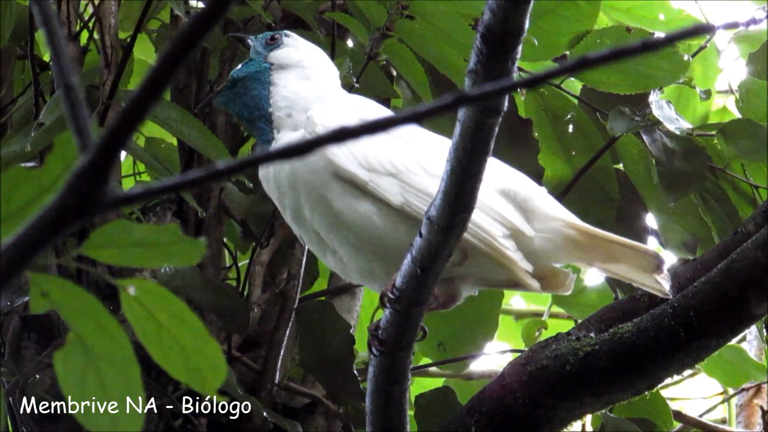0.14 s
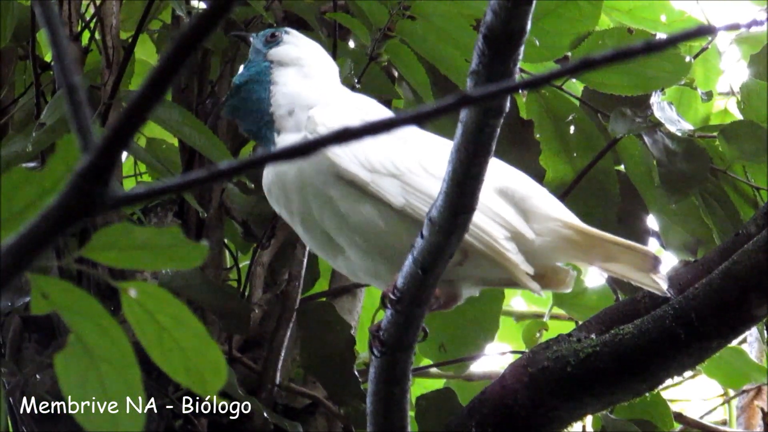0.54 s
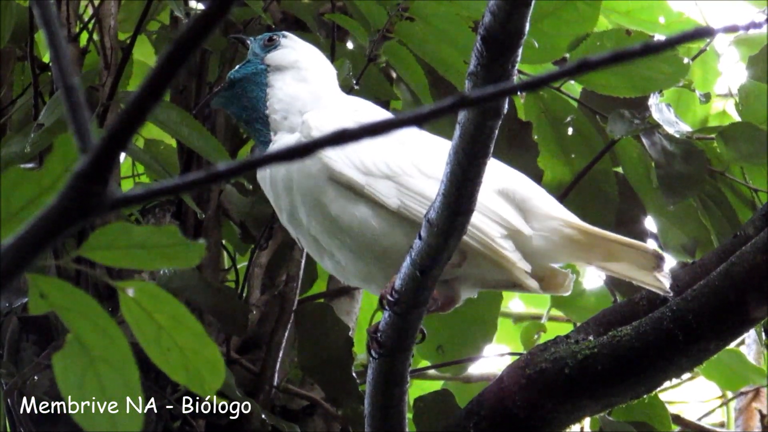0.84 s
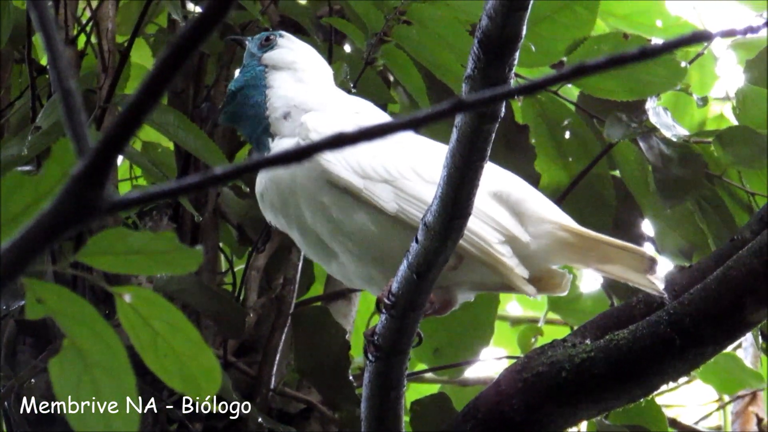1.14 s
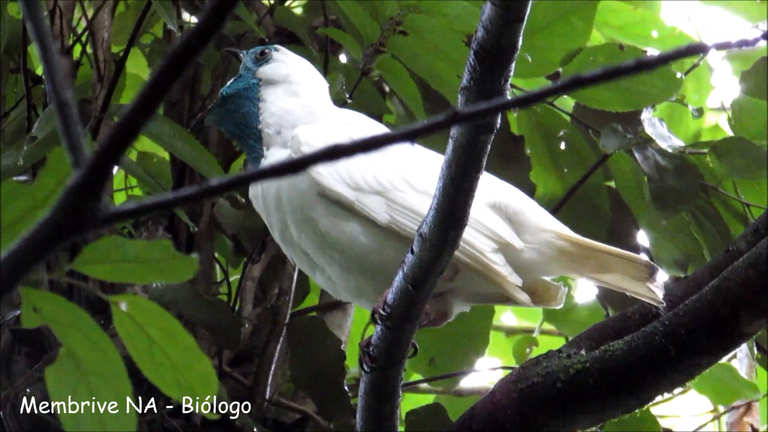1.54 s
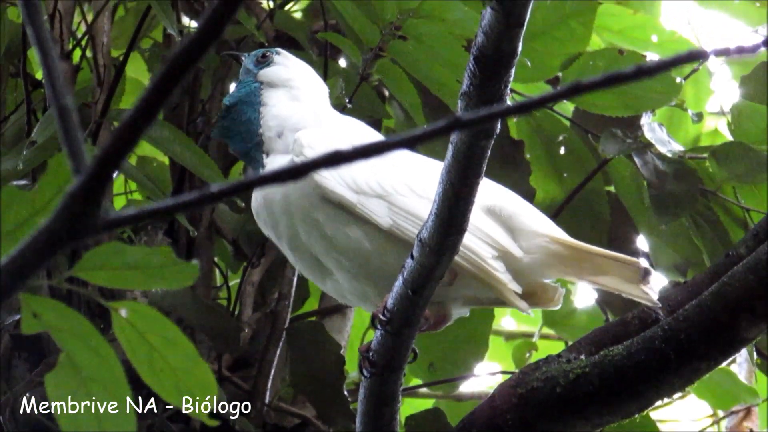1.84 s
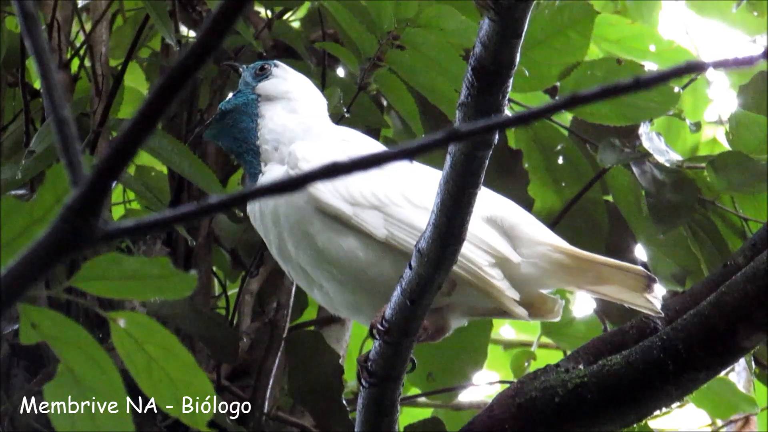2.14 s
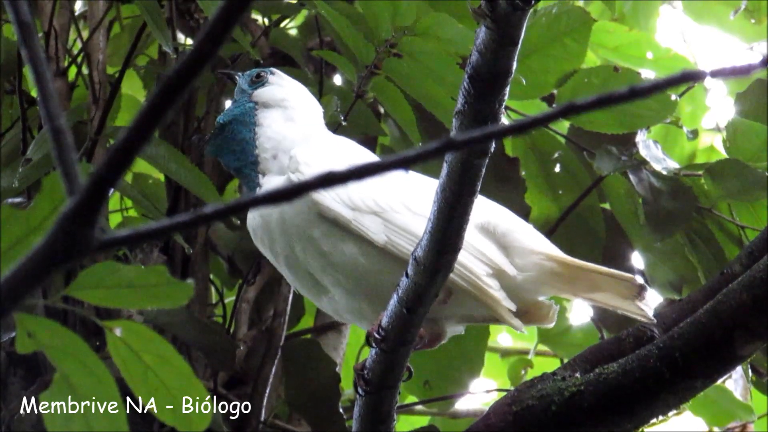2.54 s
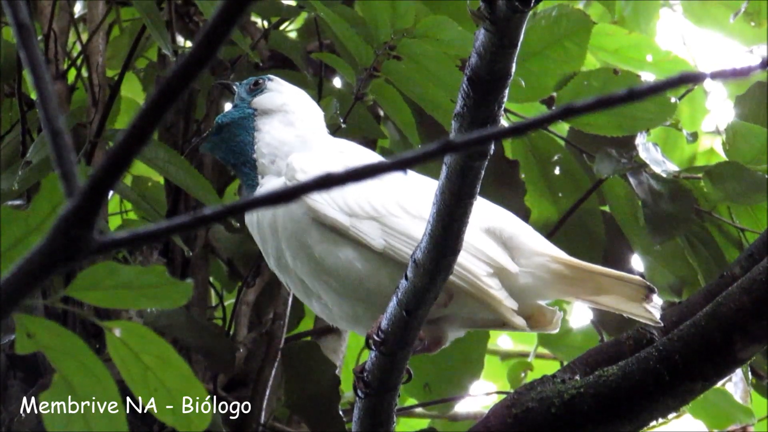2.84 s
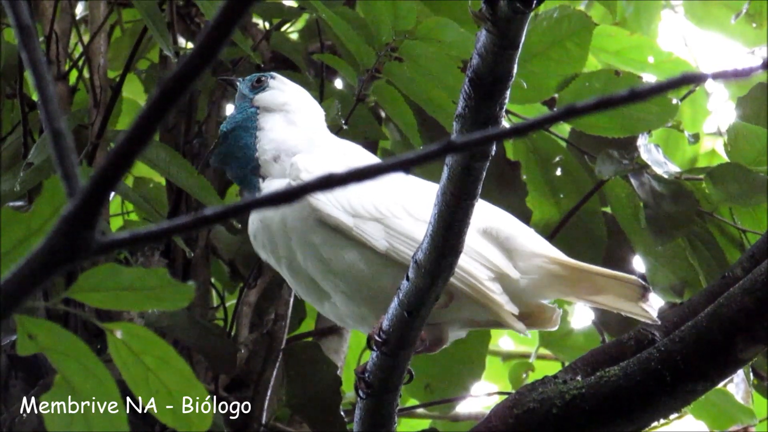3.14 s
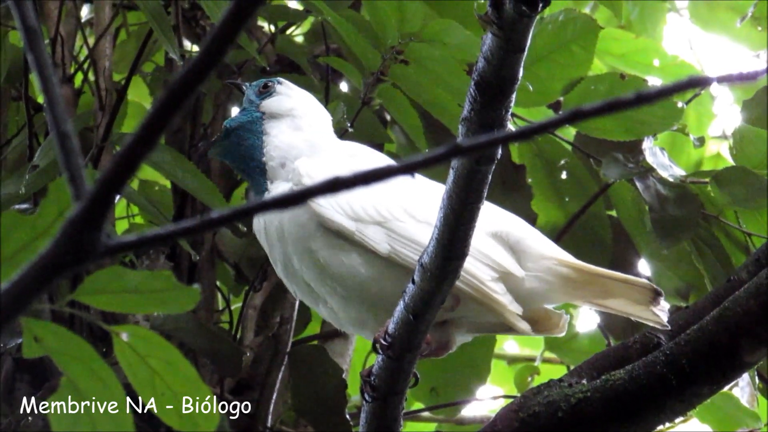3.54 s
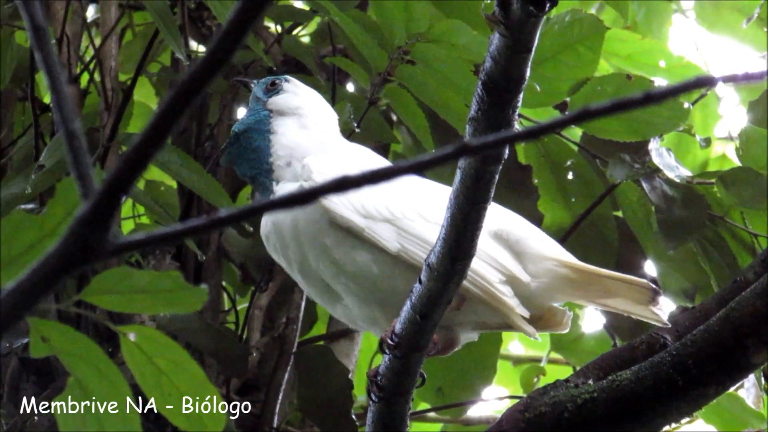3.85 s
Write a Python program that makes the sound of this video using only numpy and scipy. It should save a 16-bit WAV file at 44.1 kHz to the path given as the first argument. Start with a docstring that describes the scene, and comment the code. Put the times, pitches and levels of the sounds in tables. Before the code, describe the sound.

Loud bellbird calls ring out nearby in a steady rhythm, each a raspy metallic clang and then a clear whistle an octave higher, with a light echo. Small birds chirp far off in the quiet forest, and leaves rustle faintly.

```python
"""A bellbird close by repeats a two-part call: a throbbing clang from the two sides of its syrinx
beating against each other, then a pure whistle an octave up. Trees send back echoes and a diffuse tail.
Further off, songbirds slur, chirp and twitter in sliding near-sine notes and a dove coos faintly.
Under it all lies a quiet forest hush, with a few rustles of leaves and one soft, dull thump."""
import sys
import numpy as np
from scipy import signal
from scipy.io import wavfile

SR = 44100
rng = np.random.default_rng(int(sys.argv[2]) if len(sys.argv) > 2 else 0)


def log_audio(samples):
    """Write samples as a 16-bit WAV file to the path given in sys.argv[1]."""
    # one column per channel
    frames = np.atleast_2d(samples).T
    # limit to full scale, then quantise
    limited = np.clip(frames, -1, 1)
    pcm = np.round(limited * 32767).astype(np.int16)
    wavfile.write(sys.argv[1], SR, pcm)


N = 176400
LEAD_S, TRACK_N = .3, N + SR   # tracks start early and run long, so sounds can cross either end


def amp(db):
    """Decibels to gain."""
    return 10 ** (np.asarray(db) / 20)


def unit_rms(x):
    """Scale to an RMS of 1."""
    return x / np.sqrt(np.mean(x ** 2) + 1e-20)


def drift(rate_hz, n):
    """Smooth random wander with an RMS of 1."""
    r = np.exp(-2 * np.pi * rate_hz / SR)
    return unit_rms(signal.lfilter([1], [1, -2 * r, r * r], rng.standard_normal(n + 9000))[9000:])


def add(track, start_s, x):
    """Mix a sound into a mono track."""
    i = int((start_s + LEAD_S) * SR)
    track[i:i + len(x)] += x


def phase_of(hz):
    """Running phase of a pitch curve."""
    return 2 * np.pi * np.cumsum(hz) / SR


def noise_band(n, hz, width_hz):
    """Noise sent twice through one resonance, with an RMS of 1."""
    r = np.exp(-np.pi * width_hz / SR)
    b = np.array([1, 0, -1]) * (1 - r * r) / 2
    a = [1, -2 * r * np.cos(2 * np.pi * hz / SR), r * r]
    return unit_rms(signal.lfilter(b, a, signal.lfilter(b, a, rng.standard_normal(n))))


def stereo(mid, side, likeness):
    """Left and right from two noises: likeness 1 is mono, 0 is wide."""
    return np.sqrt(1 + likeness) * mid + np.sqrt(1 - likeness) * side * [[1], [-1]]


def glides(notes, flutter_db):
    """Sliding sine notes with soft ends and a fluttering level."""
    out = np.zeros(TRACK_N)
    for start_s, length_s, from_hz, to_hz, db in notes:
        n = int(length_s * SR)
        envelope = amp(db + flutter_db * drift(52, n)) * signal.windows.tukey(n, .5)
        add(out, start_s, np.sqrt(2) * envelope * np.sin(phase_of(np.linspace(from_hz, to_hz, n))))
    return out


def forest_hush():
    """A noise bed in gently wavering half-octave bands, centred in the lows and wider in the highs."""
    # colour of the hush: frequency_hz, relative_density_db
    colour = [(25, -24), (45, -9), (70, -2), (150, -3), (250, -7), (500, -10), (1000, -12), (2000, -19),
              (3500, -11), (5500, -10), (7300, -16), (9000, -26), (13000, -23), (15500, -50)]
    # how alike left and right are: frequency_hz, likeness (0-1)
    likeness = [(40, 1.), (90, .99), (180, .75), (500, .7), (2000, .65), (8000, .45)]
    out, edges_hz = 0, 22 * 2 ** np.arange(0, 9.6, .5)
    white = rng.standard_normal((2, 2, TRACK_N))
    for k, (low, high) in enumerate(zip(edges_hz, edges_hz[1:])):
        bandpass = signal.butter(2, [low, high], "band", fs=SR, output="sos")
        mid, side = signal.sosfilt(bandpass, white[k % 2])
        db, alike = (np.interp(np.log(low * high) / 2, np.log(hz), values)
                     for hz, values in (np.transpose(colour), np.transpose(likeness)))
        out = out + amp(db + .5 * drift(1, TRACK_N)) * stereo(mid, side, alike)
    return amp(-50) * unit_rms(out)


def rustles_and_thump():
    """Leaves rustle in grainy bursts of noise, with one soft, dull thump."""
    # bursts (the one at 900 Hz is the thump): start_s, rise_s, fade_db_per_s, centre_hz, width_hz, level_db
    bursts = [(3.47, 0.056, 25.5, 2370, 4650, -38), (0.018, 0.18, 43, 3670, 3860, -36.5),
              (2.87, 0.0087, 254, 900, 250, -50), (2.08, 0.021, 60, 13000, 5000, -56),
              (0.014, 0.088, 19, 7400, 4600, -60), (4, 0.092, 30, 7700, 3000, -56)]
    out, t = np.zeros((2, TRACK_N)), np.arange(SR // 2) / SR
    for start_s, rise_s, fade_db_per_s, hz, width_hz, db in bursts:
        grain_db = drift(60, len(t))
        envelope = amp(db - fade_db_per_s * np.maximum(t - rise_s, 0) + grain_db)
        envelope *= np.clip(t / rise_s, 0, 1)
        mid, side = (noise_band(len(t), hz, width_hz) for _ in range(2))
        add(out[0], start_s, envelope * (mid + .18 * side))
        add(out[1], start_s, envelope * (mid - .45 * side))
    return out


def dove():
    """Faint, low coos, each bending in pitch."""
    # coos: start_s, length_s, from_hz, to_hz, level_db
    coos = [(-.1, 0.38, 455, 444.6, -53), (.26, 0.21, 439, 394, -57.5), (.95, 0.53, 439, 420, -60),
            (1.66, 0.43, 445, 425, -59.5), (2.74, 0.22, 455.5, 422, -60), (3.8, 0.25, 351.4, 428, -55.5)]
    return glides(coos, flutter_db=3)


def far_twitter(count=160, low_hz=4200, high_hz=7800, level_db=-54):
    """Many small birds too far off to tell apart: short falling notes at random."""
    when, pitch, length, fall = rng.random((count, 4)).T
    from_hz = low_hz * (high_hz / low_hz) ** pitch
    to_hz = from_hz * (.95 - .28 * fall)
    notes = zip(4.8 * when - .25, .026 + .14 * length, from_hz, to_hz, np.full(count, level_db))
    return glides(notes, flutter_db=2.5)


def far_chirps():
    """Quick, high chirps of distant birds, nearly all falling."""
    # chirps: start_s, length_s, from_hz, to_hz, level_db
    notes = [(.02, 0.039, 6950, 6910, -35), (.02, 0.027, 6300, 6150, -29.5), (.17, 0.066, 7000, 5250, -39),
             (.06, 0.029, 4400, 3500, -49.5), (.03, .05, 5600, 5000, -45.5), (.25, 0.077, 4720, 4350, -57),
             (.93, .04, 2165, 2040, -53.5), (.89, 0.066, 6700, 5200, -38),
             (1.025, 0.012, 8000, 6790, -35.5), (1.06, 0.015, 7800, 6040, -31),
             (1.42, 0.023, 8000, 5340, -37), (1.62, 0.036, 7800, 5740, -39.5),
             (1.63, 0.024, 3800, 2885, -29.5), (1.73, 0.025, 8000, 5950, -34.5),
             (1.82, 0.075, 7000, 5960, -27), (1.9, 0.085, 6400, 6200, -44), (2.03, 0.026, 6200, 5700, -33),
             (2.0, 0.022, 2650, 2635, -49), (2.05, 0.037, 8200, 4600, -33), (2.1, 0.025, 7900, 7040, -28),
             (2.17, 0.014, 8200, 4200, -29.5), (2.17, 0.014, 2780, 2700, -32.5),
             (2.2, 0.014, 3300, 3000, -31), (2.23, 0.02, 2550, 2510, -49), (2.645, 0.022, 7100, 4460, -29),
             (2.7, 0.045, 7000, 4900, -49), (2.93, 0.041, 5800, 5400, -45.5), (2.96, .07, 4250, 3770, -53),
             (2.98, 0.0078, 7800, 7100, -43), (3.0, 0.01, 4750, 4770, -40.5),
             (3.35, 0.032, 2900, 2400, -43), (3.97, 0.038, 3750, 2600, -29), (3.09, 0.023, 6800, 5810, -30),
             (3.33, 0.025, 6100, 4860, -32), (3.335, 0.0081, 9000, 8500, -38.5),
             (3.38, 0.027, 7200, 4320, -36.5), (3.47, 0.066, 7300, 4980, -40.5),
             (3.79, 0.038, 6900, 4840, -27), (3.96, 0.045, 8700, 8200, -38.5)]
    return glides(notes, flutter_db=2.5)


def songbird():
    """One phrase of near-sine slurs; a faint third harmonic comes in on the higher pitches."""
    # slurred notes, each a list of contour points: time_s, pitch_hz, level_db
    phrase = [
        [(0.82, 5100, -78), (0.836, 4150, -59), (0.912, 3604, -29), (0.92, 3880, -43.5), (0.932, 3290, -45),
         (0.94, 3614, -65.5)],
        [(1.03, 4510, -20), (1.046, 4160, -43), (1.132, 3590, -29), (1.138, 3360, -32.5), (1.15, 3340, -45.5)],
        [(1.24, 4350, -40.5), (1.252, 4412, -40.5), (1.268, 4320, -26.5), (1.344, 5560, -30.5),
         (1.368, 5634, -30), (1.38, 5500, -29.5)],
        [(1.43, 4630, -47), (1.438, 4287, -38), (1.46, 4160, -32), (1.482, 4280, -24.5), (1.528, 5540, -27.5),
         (1.56, 5730, -32)],
        [(1.68, 4140, -70), (1.688, 4106, -51.5), (1.7, 3943, -31), (1.72, 4050, -28), (1.746, 4295, -27.5),
         (1.77, 4320, -37)],
    ]
    out = np.zeros(TRACK_N)
    for note in phrase:
        times_s, pitches_hz, levels_db = np.transpose(note)
        t = np.arange(times_s[0], times_s[-1], 1 / SR)
        hz = np.interp(t, times_s, pitches_hz)
        phase = phase_of(hz)
        fades = np.clip(np.minimum(t - times_s[0], times_s[-1] - t) / .012, 0, 1)
        envelope = amp(np.interp(t, times_s, levels_db) + 3 * drift(130, len(t))) * fades
        third = amp(-34.5) * np.clip((hz - 4300) / 500, 0, 1) * np.sin(3 * phase)
        add(out, times_s[0], np.sqrt(2) * envelope * (np.sin(phase) + third))
    return out


def forest_tail(x, t60_s, likeness):
    """Scatter among leaves and trunks: a stereo reverb of decaying noise with unit energy."""
    t = np.arange(SR) / SR
    mid, side = rng.standard_normal((2, SR)) * amp(-60 * t / t60_s) * np.clip(t / .02, 0, 1)
    impulse = stereo(mid, side, likeness)
    impulse /= np.sqrt(np.mean(np.sum(impulse ** 2, axis=1)))
    return signal.fftconvolve(x[None], impulse, axes=1)[:, :len(x)]


def trunk_echoes(x, sway_db=3):
    """Distinct echoes off trunks; moving leaves make each one come and go."""
    # reflections: delay_s, level_db, lean_left (negative leans right)
    reflections = [(.075, -19, .25), (.19, -26, -.35), (.28, -33, .35)]
    out = 0
    for delay_s, db, lean in reflections:
        gain = amp(db + sway_db * drift(3.3, TRACK_N))
        out = out + gain * np.roll(x, int(delay_s * SR)) * [[1 + lean], [1 - lean]]
    return out


def bellbird_whistles(scoop_hz=46, scoop_s=.022, end_rise_hz=31):
    """A rounded swell that scoops down onto its pitch, then lifts; overtones flicker and lean left."""
    # whistles: start_s, length_s, pitch_hz, level_db, peak_position (0-1)
    calls = [(-.07, .125, 3150, -8, .45), (.595, .127, 3137, -7.5, .45), (1.266, .126, 3149, -8, .45),
             (1.885, .139, 3135, -8.5, .42), (2.506, .127, 3144, -8, .45), (3.197, .115, 3146, -8.5, .52),
             (3.824, .131, 3135, -7, .38)]
    # partials of the whistle: pitch_multiple, level_db
    partials = [(.5, -26), (1, -0.5), (2, -33.5), (3, -39), (4, -46.5)]
    out = np.zeros((2, TRACK_N))
    for start_s, length_s, hz, db, peak_position in calls:
        progress = np.linspace(0, 1, int(length_s * SR))
        swell = np.sin(np.pi * np.interp(progress, [0, peak_position, 1], [0, .5, 1])).clip(0) ** .91
        scoop = scoop_hz * np.exp(-progress * length_s / scoop_s)
        phase = phase_of(hz + scoop + end_rise_hz * (progress ** 2 - .25))
        for multiple, partial_db in partials:
            lean = .1 * max(multiple - 1, 0)
            flicker_db = (.2 if multiple == 1 else 3) * drift(25, len(progress))
            partial = np.sqrt(2) * amp(db + partial_db + flicker_db) * swell * np.sin(multiple * phase)
            add(out[0], start_s, (1 + lean) * partial)
            add(out[1], start_s, (1 - lean) * partial)
    return out


def bellbird_rasp(t, beat, rise_from_s=.012, peak_s=.037, fade_db_per_s=107):
    """The noisy edge of one clang: it flares, then dies away, throbbing with the beat."""
    # resonances of the rasp: centre_hz, width_hz, level_db
    resonances = [(1010, 170, -39), (1439, 227, -16), (2600, 410, -24.5), (3151, 168, -16.5),
                  (4200, 170, -24), (4350, 1200, -18), (6200, 2130, -23.5), (8800, 4400, -37)]
    noise = sum(amp(db) * noise_band(len(t), hz, width_hz) for hz, width_hz, db in resonances)
    flare = .12 + 1.076 * np.clip((t - rise_from_s) / (peak_s - rise_from_s), 0, 1)
    decay = amp(-fade_db_per_s * np.maximum(t - peak_s, 0))
    fades = np.clip(t / .0034, 0, 1) * np.clip(4 - 16 * t, 0, 1)
    return noise * flare * decay * fades * (1 + .18 * np.cos(beat))


def bellbird_clangs(beat_extra_hz=48, settle_s=.029, throat_width_hz=31):
    """Two beating voices and their combination tones, shaped by the throat, plus octave band and rasp."""
    # clangs: start_s, loud_throb_s, upper_voice_hz, beat_hz, throat_centre_hz, level_db
    calls = [(-.21, -0.155, 1558, 74.4, 1538, -8), (0.447, 0.514, 1559, 77.8, 1531, -13),
             (1.122, 1.1909, 1578, 75.2, 1529, -13), (1.741, 1.793, 1572, 76.9, 1526, -13.5),
             (2.362, 2.4274, 1568, 75.2, 1532, -13.5), (3.056, 3.1222, 1573, 76.2, 1535, -12.5),
             (3.682, 3.7483, 1592, 76.9, 1521, -12)]
    # envelope of a clang: time_s, main_band_db, octave_band_db
    envelope = [(0, -33, -44.5), (.003, -17, -25.5), (0.013, -13, -18.5), (.03, -2, -3), (.05, 2, -3),
                (.09, 0, -9.5), (.14, -6.5, -3.5), (.16, -9.5, -3), (.2, -46, -22.5), (.24, -67, -78)]
    # partials around twice the upper voice: offset_beats (rounded for pitch), level_db
    octave_partials = [(-2.2, -24), (-0.84, -13), (0, -5.5), (0.82, -20.5), (2.6, -21.5)]
    out, n = np.zeros(TRACK_N), SR // 4
    t = np.arange(n) / SR
    times_s, *bands_db = np.transpose(envelope)
    main_db, octave_db = (np.interp(t, times_s, band) for band in bands_db)
    onset_jitter_rad = np.exp(-(t / settle_s / 2) ** 2)
    for start_s, throb_s, hz, beat_hz, throat_hz, db in calls:
        beat = phase_of(beat_hz + beat_extra_hz * np.exp(-(t / settle_s) ** 2))   # starts fast, settles
        beat -= np.interp(throb_s - start_s, t, beat)   # line up a throb with throb_s
        voice = phase_of(hz + 3 * drift(33, n))
        partials = []
        for k in range(-4, 4):   # 0 and -1 are the voices, the rest combination tones
            throat_db = -((hz + k * beat_hz - throat_hz) / throat_width_hz) ** 2
            smear_rad = .3 * (k + .5) ** 2   # outer partials slip out of step, spreading the throb
            partials.append((voice + k * beat + smear_rad, main_db + throat_db))
        for offset, partial_db in octave_partials:
            partials.append((2 * voice + round(offset) * beat + 2 * offset ** 2, octave_db + partial_db))
        ring = 0
        for phase, partial_db in partials:
            gain = amp(partial_db + 1.3 * drift(7.5, n))
            ring = ring + gain * np.sin(phase + onset_jitter_rad * drift(45, n))
        add(out, start_s, amp(db) * (ring + bellbird_rasp(t, beat)))
    return out


def scene():
    """The bellbird up front with its echoes, the songbirds deep in reverb, the forest bed beneath."""
    slightly_left = amp([[.6], [-.6]])
    clang, whistle = bellbird_clangs(), bellbird_whistles()
    whistle_mono = whistle.mean(axis=0)
    mix = clang * slightly_left + whistle
    mix += amp(-24) * forest_tail(clang + whistle_mono, t60_s=1.1, likeness=.55)
    mix += trunk_echoes(amp(-3) * clang + whistle_mono)   # the low clang reflects less than the whistle
    song, chirps = songbird(), far_chirps()
    mix += song * amp([[1], [-1]]) + amp(-8) * chirps
    reverb_send = amp(-3.5) * song + chirps + far_twitter()
    mix += forest_tail(reverb_send, t60_s=.49, likeness=.5) * slightly_left
    mix += dove() + forest_hush() + rustles_and_thump()
    return mix[:, int(LEAD_S * SR):][:, :N]


def record(dry, cutoff_hz=15800):
    """A steep low-pass takes off the very top."""
    return signal.sosfilt(signal.ellip(10, .5, 70, cutoff_hz, fs=SR, output="sos"), dry)


dry = scene()
out = record(dry)
log_audio(out)
```